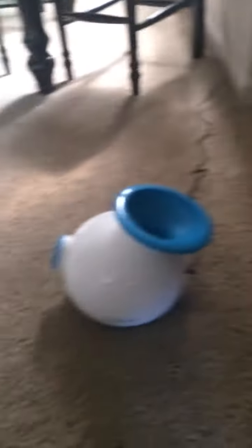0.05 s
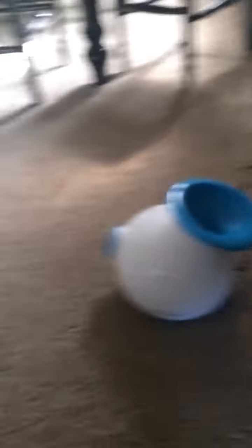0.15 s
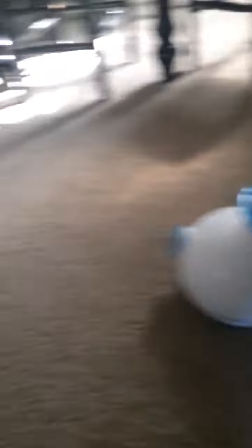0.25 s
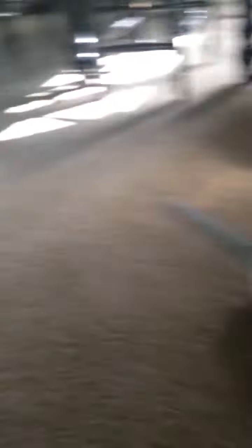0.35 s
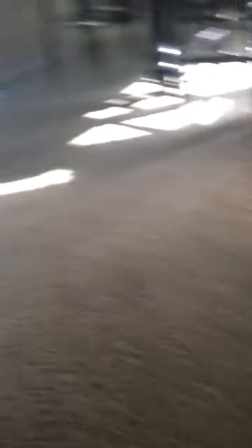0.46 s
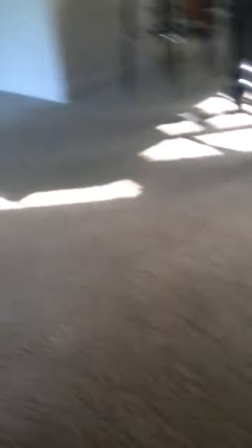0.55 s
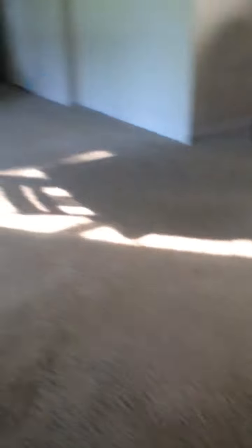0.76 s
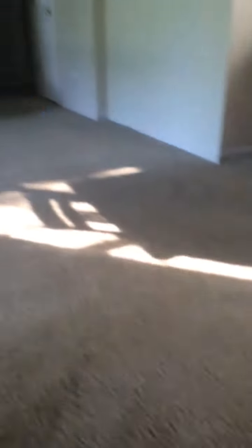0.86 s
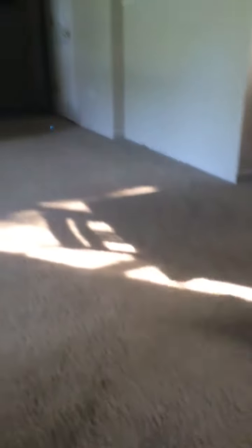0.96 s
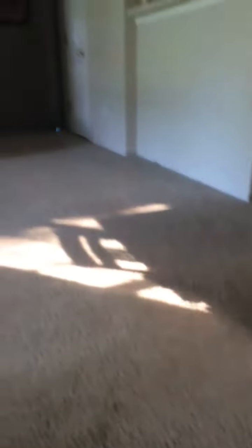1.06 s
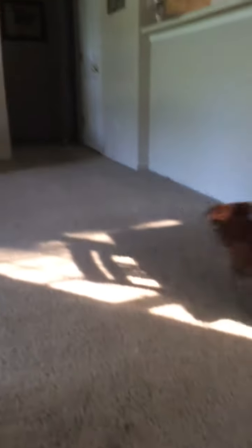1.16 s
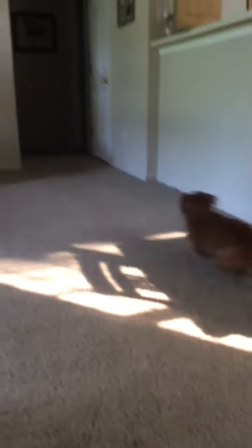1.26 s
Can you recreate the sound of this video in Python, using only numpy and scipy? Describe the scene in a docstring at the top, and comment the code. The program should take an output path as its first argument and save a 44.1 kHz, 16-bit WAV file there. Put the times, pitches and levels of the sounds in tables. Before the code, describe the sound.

Sharp snap of a plastic ball launcher over faint motor whine, followed by a thud.

```python
"""In a quiet carpeted room, a plastic toy ball launcher fires. Its small motor whines at the gear-mesh
frequency; the spring plunger lets go, and its sharp impact excites the modes of the shell. The
mechanism knocks, and a latch clacks as the motor stops. The ball lands with a short friction squeak
and a thud from the modes of the floor; light ticks and soft footfalls follow."""
import sys
import numpy as np
from scipy import signal
from scipy.fft import rfft, irfft
from scipy.io import wavfile

SR = 44100
rng = np.random.default_rng(int(sys.argv[2]) if len(sys.argv) > 2 else 0)


def wav_record(signal):
    """Record a signal, one row per channel, as 16-bit PCM in the file named by sys.argv[1]."""
    frames = np.transpose(np.atleast_2d(signal))
    bounded = np.clip(frames, -1, 1)
    # unit amplitude maps onto the largest positive 16-bit level
    quanta = np.round(bounded * 32767).astype(np.int16)
    wavfile.write(sys.argv[1], SR, quanta)


N = 57330
T = np.arange(N) / SR


def from_db(db):
    """Amplitude ratio: a factor of ten for every 20 dB."""
    return 10 ** (np.asarray(db) / 20)


def noise(spectrum):
    """Spectral shaping: noise of rms 1, coloured by (frequency [Hz], relative density [dB])."""
    hz, db = np.transpose(spectrum)
    f = np.maximum(np.arange(N // 2 + 1) * SR / N, 1)
    gain = from_db(np.interp(np.log(f), np.log(hz), db)) * np.minimum(f / hz[0], 1) ** 2
    x = irfft(rfft(rng.standard_normal(N)) * gain, N)
    return x / x.std()


def drift(hz):
    """Low-pass noise: a random wander of rms 1."""
    return noise([(1, 0), (hz, 0), (hz * 10, -60)])


def tone(hz):
    """Phase is the integral of frequency: a sine of rms 1 along a pitch curve."""
    return np.sqrt(2) * np.sin(2 * np.pi * np.cumsum(hz) / SR)


def chirp(centre_s, sigma_s, hz, hz_per_s, db):
    """Linear frequency sweep under a bell-shaped envelope."""
    offset = T - centre_s
    envelope = from_db(db) * np.exp(-.5 * (offset / sigma_s) ** 2)
    return envelope * tone(np.maximum(hz + hz_per_s * offset, 0))


def bursts(hits, spectrum, db, attack_s, t60):
    """Incoherent addition: dense ringing swells and dies after each hit, and the powers add."""
    power = 0
    for onset, hit_db in hits:
        age = np.maximum(T - onset, 0)
        envelope = from_db(db + hit_db - 60 * age / t60) * np.minimum(age / attack_s, 1)
        power = power + envelope ** 2
    return np.sqrt(power) * noise(spectrum)


def ring(hits, modes, db, scatter_db):
    """Modal superposition: each hit starts damped sines of slightly random strength."""
    out = np.zeros(N)
    for onset, hit_db in hits:
        age = np.maximum(T - onset, 0)
        for k, (hz, mode_db, t60) in enumerate(modes):
            start_db = db + hit_db + mode_db + scatter_db * rng.normal()
            out += (-1) ** k * from_db(start_db - 60 * age / t60) * np.sin(2 * np.pi * hz * age)
    return out


def room(x, db, t60):
    """Reverberation: convolution with decaying noise adds a tail to the direct sound."""
    tail = rng.standard_normal(N) * from_db(-60 * T / t60) * (T > .003)
    return x + from_db(db) * signal.fftconvolve(x, tail / np.linalg.norm(tail))[:N]


def high_pass(x, hz):
    """Second-order filtering: bass below the cutoff falls 12 dB per octave."""
    return signal.sosfilt(signal.butter(2, hz, "high", fs=SR, output="sos"), x)


# spectrum of the room's background: (frequency [Hz], relative density [dB])
HUSH_SPECTRUM = [(15, -46), (25, -23), (128, -7.5), (383, -12.5), (501, -15.5), (927, -17.5), (2780, -35),
                 (6040, -36), (6900, -25), (8100, -36.5), (15000, -40)]

def hush():
    """Stationary noise: the quiet background of the room."""
    return from_db(-58.5) * noise(HUSH_SPECTRUM)


# motor effort: (time [s], relative level [dB])
MOTOR_EFFORT = [(0, 1), (.1, 0), (.21, 0.5), (.37, 1), (.5, 8.5), (.66, 3.5), (.72, 3), (.78, -47),
                (.9, -50)]
# partials of the gear hum: (frequency [Hz], relative level [dB])
GEAR_PARTIALS = [(170, -69), (339, -62), (619, -65.5), (1227, -67), (1857, -67.5), (9450, -84)]
# spectrum of the gear whirr: (frequency [Hz], relative density [dB])
WHIRR_SPECTRUM = [(59, -37.5), (100, -12.5), (345, -10.5), (570, -17.5), (633, -3.5), (4000, -16),
                  (4840, -13), (5600, -26), (6220, -14), (15000, -28)]

def motor():
    """Modulation: sidebands flank the gear-mesh whine at the shaft rate, over hum and whirr."""
    mesh_hz, shaft_hz = 6220, 174
    whine = [(mesh_hz, -62.5), (mesh_hz - shaft_hz, -75.5), (mesh_hz + shaft_hz, -75.5)]
    partials = whine + list(GEAR_PARTIALS)
    speed = 1 + .00035 * drift(30)
    tones = sum(from_db(db + 1.3 * drift(25)) * tone(hz * speed) for hz, db in partials)
    whirr = from_db(-55.5) * noise(WHIRR_SPECTRUM)
    effort = from_db(np.interp(T, *np.transpose(MOTOR_EFFORT)))
    return effort * (tones + whirr)


def motor_squeak():
    """A falling chirp: the motor squeaks once under load."""
    return chirp(centre_s=.092, sigma_s=.011, hz=4820, hz_per_s=-4600, db=-51.5)


# spectrum of the slipping catch: (frequency [Hz], relative density [dB])
CATCH_SPECTRUM = [(150, -5.5), (700, -3), (1800, 3), (3500, -11), (6000, -13.5), (10000, -17), (15000, -22)]

def catch():
    """Release transient: the catch slips and frees the plunger."""
    return bursts([(.2174, 0)], CATCH_SPECTRUM, db=-28, attack_s=.0008, t60=.06)


# the plunger's strike and chatter: (time [s], relative level [dB])
PLUNGER_HITS = [(.2231, 1), (.2243, -1), (.2257, -7.5)]
# spectra of the crack and its reverberation: (frequency [Hz], relative density [dB])
PLUNGER_CRACK = [(100, -29), (200, -8.5), (800, -8), (1400, -4.5), (2000, -4), (2700, 2), (3900, 2),
                 (4800, -0.5), (5600, -12.5), (6700, -10), (9000, -17.5), (15000, -15.5)]
PLUNGER_TAIL = [(60, -29), (110, -21.5), (190, -15.5), (262, -3.5), (360, -21.5), (760, -8.5), (1000, -4.5),
                (1600, -5.5), (2300, -3.5), (3600, -6.5), (5400, -13.5), (7000, -15.5), (10000, -27),
                (15000, -30.5)]
# modes of the plastic shell and, lower, the body: (frequency [Hz], relative level [dB], T60 [s])
SHELL_MODES = [(991, -34, .25), (1373, -28.5, .24), (1757, -33, .17), (2063, -36, .24), (2456, -29, .22),
               (2612, -35, .19), (2777, -29.5, .25), (2928, -32, .16), (3196, -31.5, .2),
               (3365, -30.5, .19), (3483, -32, .22), (3732, -30, .18), (4057, -32, .14), (6045, -37, .16)]
BODY_MODES = [(64, -57, 0.18), (214, -34, 0.037), (274, -31.5, 0.13), (385, -32, 0.063), (582, -26, 0.036),
              (835, -27, .05)]

def plunger():
    """Impact excitation: the strike rings shell and body; the room's treble decays first."""
    strike = PLUNGER_HITS[:1]
    crack = bursts(PLUNGER_HITS, PLUNGER_CRACK, db=-6.5, attack_s=.00054, t60=.015)
    tail = bursts(strike, PLUNGER_TAIL, db=-23.5, attack_s=.002, t60=.31)
    treble_spectrum = [(2000, -15), (4000, 3.5), (7000, -1.5), (15000, -9)]
    treble = bursts(strike, treble_spectrum, db=-26, attack_s=.0016, t60=.15)
    shell = ring(strike, SHELL_MODES, db=-.5, scatter_db=1.7)
    body = ring(strike, BODY_MODES, db=0, scatter_db=-.3)
    return crack + tail + treble + shell + body


# dull knocks of the mechanism: (time [s], relative level [dB])
KNOCK_HITS = [(.3922, -29), (.4960, -29), (.5985, -30), (.6880, -35)]
# spectrum of a knock: (frequency [Hz], relative density [dB])
KNOCK_SPECTRUM = [(120, -30), (300, 4), (600, -7.5), (900, 6), (1150, -5), (1400, 0), (1750, 2.5),
                  (2000, -1.5), (2270, 4.5), (2500, -6.5), (2850, -8.5), (3300, -21), (4200, -20.5),
                  (12000, -29)]

def knocks():
    """Nearly periodic impacts: the running mechanism knocks about ten times a second."""
    direct = bursts(KNOCK_HITS, KNOCK_SPECTRUM, db=1, attack_s=.0015, t60=.055)
    tail = bursts(KNOCK_HITS, KNOCK_SPECTRUM, db=-9.5, attack_s=.0094, t60=.25)
    return direct + tail


# course of the ball's squeak: (time [s], frequency [Hz], level of the fundamental [dB])
SKID_PATH = [(0.427, 2900, -60), (0.433, 3060, -43.5), (.435, 3170, -39), (0.4378, 3440, -38.5),
             (.4405, 2802, -29), (0.442, 1994, -31), (0.4446, 1240, -33.5), (0.45, 900, -68)]

def ball_skid():
    """Sliding friction: the ball skids with a rough squeak that rises a little, then plunges."""
    times, hz, db = np.transpose(SKID_PATH)
    pitch = np.interp(T, times, hz) * (1 + .09 * drift(570))
    squeak = tone(pitch) + from_db(-1.5) * tone(2 * pitch)
    hiss = from_db(-1) * noise([(800, -2), (3000, -15), (6500, -6), (10000, 0), (15000, -5.5)])
    envelope = from_db(np.interp(T, times, db)) * (T > times[0]) * (T < times[-1])
    return room(envelope * (squeak + hiss), db=-11, t60=.22)


# modes of the floor: (frequency [Hz], relative level [dB], T60 [s])
FLOOR_MODES = [(88, -41, .7), (130, -34, .42), (214, -35, .22), (302, -33.5, .4)]
# spectrum of the thud: (frequency [Hz], relative density [dB])
THUD_SPECTRUM = [(50, -14), (120, -4.5), (230, 0), (420, -9), (700, -14), (930, -6.5), (1200, -14),
                 (1800, -11), (3500, -35), (8000, -33), (15000, -40)]

def ball_thud():
    """Nonlinear contact: the squashed ball stiffens, so its push rises in pitch; the floor booms."""
    hit = [(.4455, 0)]
    push = chirp(centre_s=.4535, sigma_s=.0083, hz=176.6, hz_per_s=6000, db=-28)
    boom = high_pass(ring(hit, FLOOR_MODES, db=0, scatter_db=.3), hz=60)
    thud = bursts(hit, THUD_SPECTRUM, db=-30, attack_s=.0029, t60=.37)
    return push + boom + thud


# light ticks: (time [s], relative level [dB])
TICK_HITS = [(.5125, -32), (.5538, -28), (.5780, -28.5), (.671, -49), (.946, -44.5)]
# spectrum of a tick: (frequency [Hz], relative density [dB])
TICK_SPECTRUM = [(1000, -26), (3300, -15), (5000, -4), (8000, 0), (12000, -1), (15000, -3)]

def ticks():
    """Brief contact gives a wide bandwidth: tiny hard impacts close by sound bright."""
    snap = bursts(TICK_HITS, TICK_SPECTRUM, db=0, attack_s=.0002, t60=.009)
    tail = bursts(TICK_HITS, TICK_SPECTRUM, db=-16, attack_s=.0018, t60=.061)
    return snap + tail


# the latch's drop and rebounds: (time [s], relative level [dB])
LATCH_HITS = [(.7368, 1), (.7453, -12), (.7615, -5.5)]
# spectra of the clack, its reverberation and the spring: (frequency [Hz], relative density [dB])
CLACK_SPECTRUM = [(88, -42), (150, -13.5), (1430, -1), (4910, -9.5), (5840, -20.5), (8410, -10.5),
                  (9630, -15), (11500, -16), (15000, -19)]
CLACK_TAIL = [(88, -51), (150, -37), (324, -1), (525, -16.5), (1700, -3), (1950, -2), (2970, -15.5),
              (3820, -15.5), (7640, -23), (8580, -23), (15000, -29)]
SPRING_SPECTRUM = [(7000, -40), (8200, -14), (8400, 0), (8680, 0), (8900, -14), (10500, -40)]
# modes of the latch: (frequency [Hz], relative level [dB], T60 [s])
LATCH_RESONANCES = [(1228, -39, .2), (1530, -38, .22), (1820, -42, .28), (2225, -42, .22)]

def latch():
    """Impact and free vibration: a bright clack rings latch and spring, leaving a dull room tail."""
    drop = LATCH_HITS[:1]
    clack = bursts(LATCH_HITS, CLACK_SPECTRUM, db=-19.5, attack_s=.0003, t60=.022)
    early_tail = bursts(drop, CLACK_TAIL, db=-29, attack_s=.012, t60=.24)
    late_spectrum = [(200, 0), (400, 2.5), (700, -5), (2200, -4), (4000, -15), (12000, -27.5)]
    late_tail = bursts(drop, late_spectrum, db=-40.5, attack_s=.018, t60=.6)
    spring = bursts(drop, SPRING_SPECTRUM, db=-45, attack_s=.004, t60=.29)
    ringing = ring(drop, LATCH_RESONANCES, db=1.5, scatter_db=-.5)
    return clack + early_tail + late_tail + spring + ringing


# footfalls on carpet: (time [s], relative level [dB], frequency of the pat [Hz])
FOOTFALLS = [(.8555, -41, 260), (.8915, -43, 160), (.9030, -43, 150), (.9725, -49, 130), (1.0065, -45, 140),
             (1.0230, -46, 160), (1.0935, -41, 220), (1.1515, -47, 170), (1.1725, -45, 140),
             (1.2180, -50, 300), (1.2840, -45, 170)]
# scuffs of the pile: (time [s], relative level [dB])
SCUFF_HITS = [(.99, -52), (1.10, -56.5), (1.168, -53), (1.195, -53), (1.22, -58)]
# spectra of rumble and scuff: (frequency [Hz], relative density [dB])
RUMBLE_SPECTRUM = [(30, -22), (65, -10.5), (120, 3), (190, -1.5), (330, -3), (550, -20.5), (1100, -20.5),
                   (2200, -29.5), (6000, -39.5)]
SCUFF_SPECTRUM = [(200, -8), (350, 6.5), (700, -2.5), (1400, -20), (2500, -36), (8000, -26.5)]

def footfalls():
    """Heavy damping: each pat is one push and rebound of the floor, with rumble and some scuffing."""
    decay_cycles = 4.8
    pats = sum(ring([(onset, db)], [(hz, 0, decay_cycles / hz)], db=8, scatter_db=2.5)
               for onset, db, hz in FOOTFALLS)
    hits = [(onset, db) for onset, db, _ in FOOTFALLS]
    rumble = bursts(hits, RUMBLE_SPECTRUM, db=-4.5, attack_s=.0043, t60=.42)
    scuffs = bursts(SCUFF_HITS, SCUFF_SPECTRUM, db=5, attack_s=.008, t60=.12)
    return high_pass(pats, hz=60.5) + rumble + scuffs


def scene():
    """Superposition: the pressures of all sources add in one channel."""
    launcher = motor() + motor_squeak() + catch() + plunger() + knocks() + latch()
    ball = ball_skid() + ball_thud()
    return (launcher + ball + ticks() + footfalls() + hush())[None]


def record(dry):
    """Soft saturation rounds the peaks; a steep low-pass filter limits the bandwidth."""
    rounded = .8 * np.tanh(dry / .8)
    low_pass = signal.ellip(12, .1, 70, 15400, fs=SR, output="sos")
    return signal.sosfilt(low_pass, rounded)


dry = scene()
out = record(dry)
wav_record(out)
```